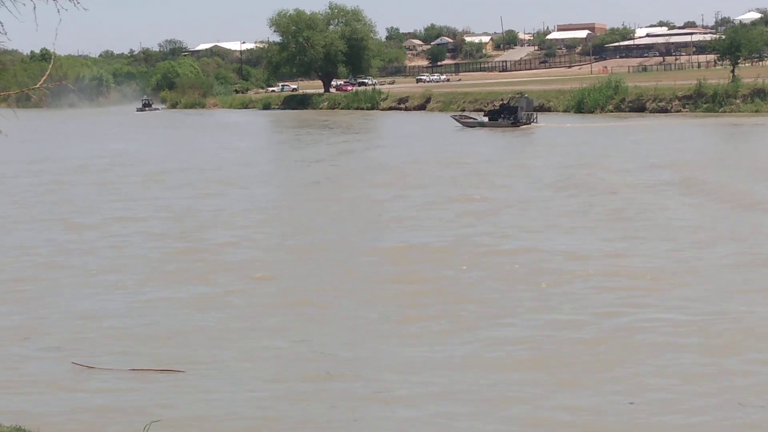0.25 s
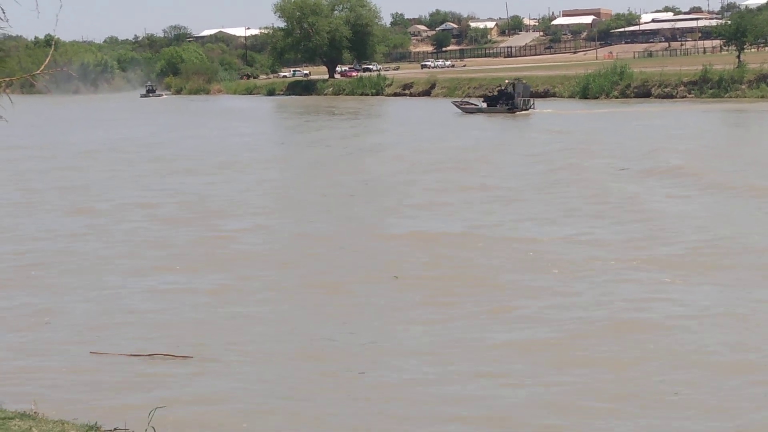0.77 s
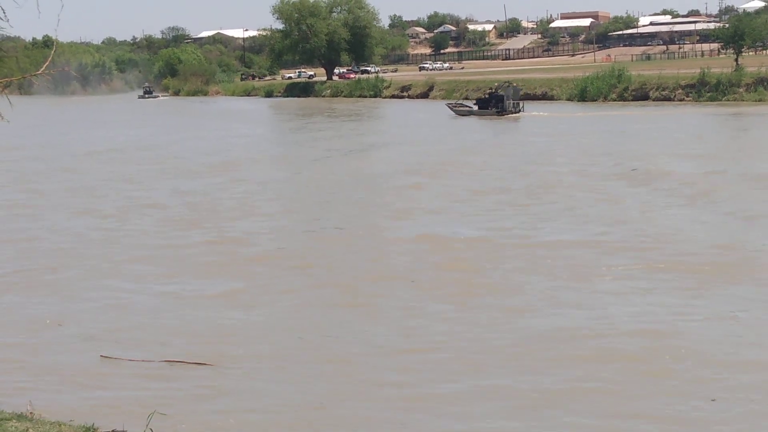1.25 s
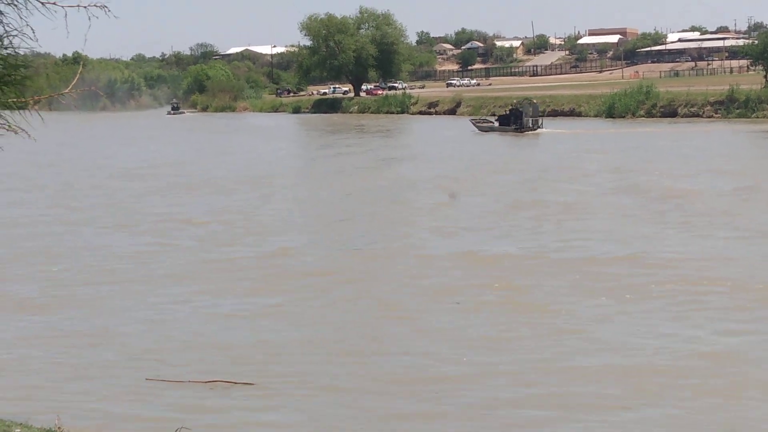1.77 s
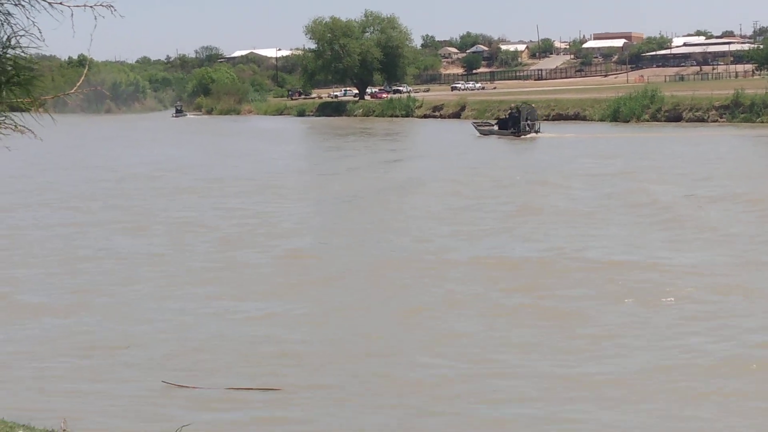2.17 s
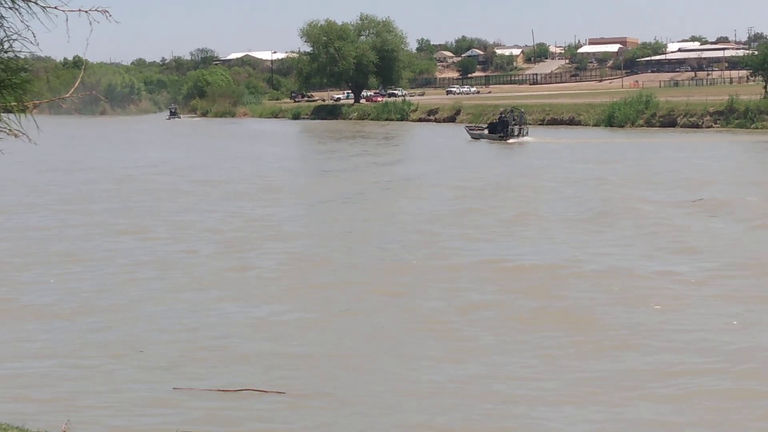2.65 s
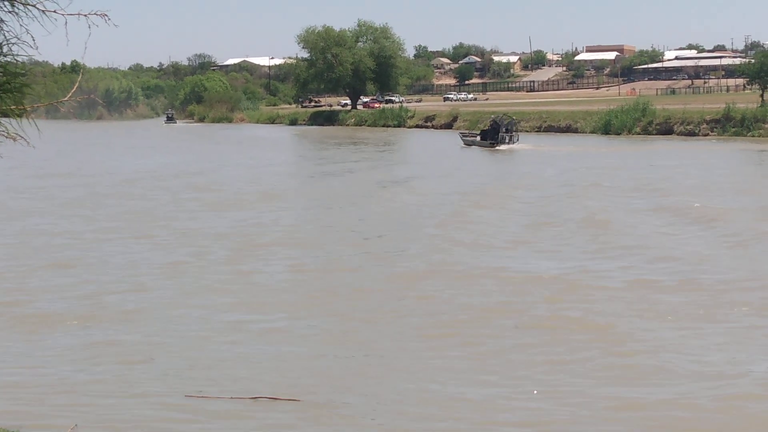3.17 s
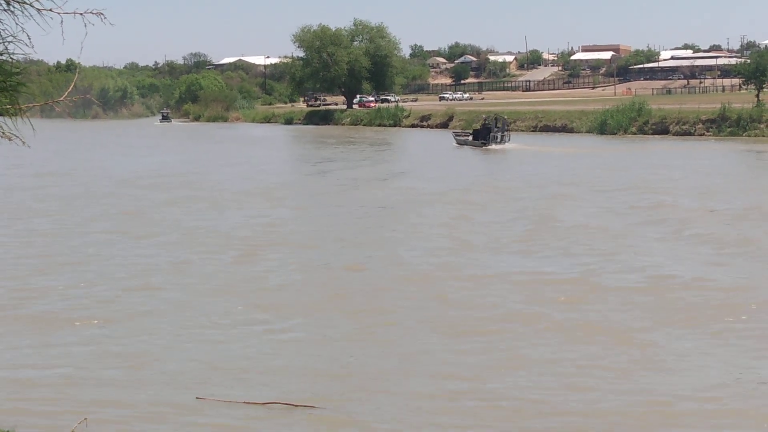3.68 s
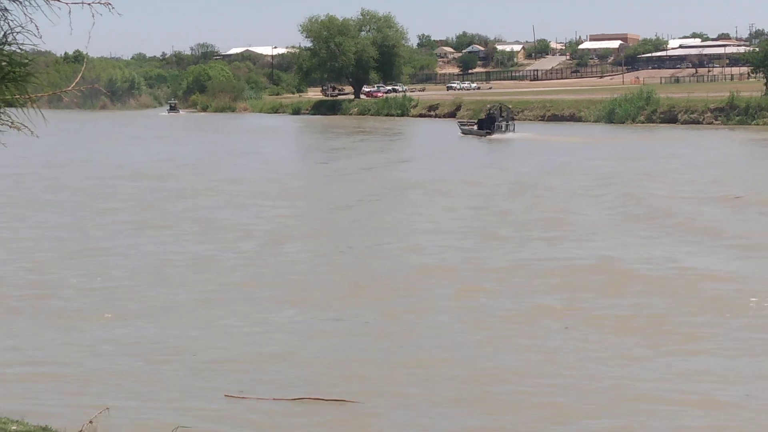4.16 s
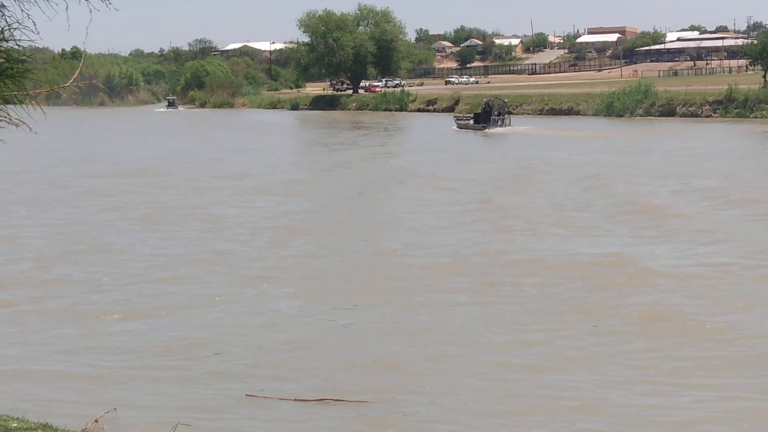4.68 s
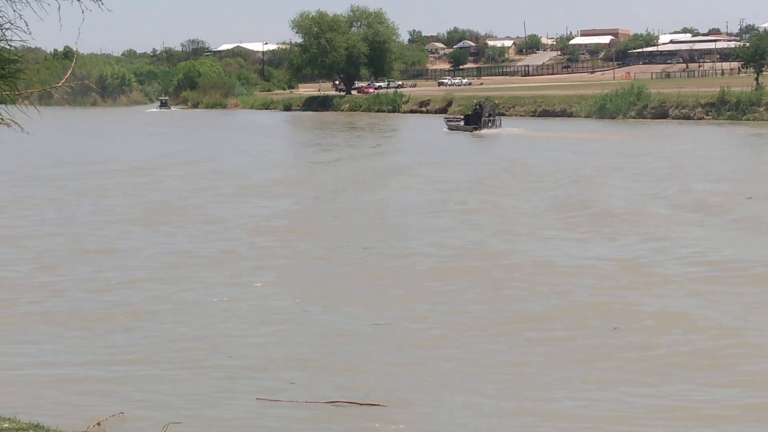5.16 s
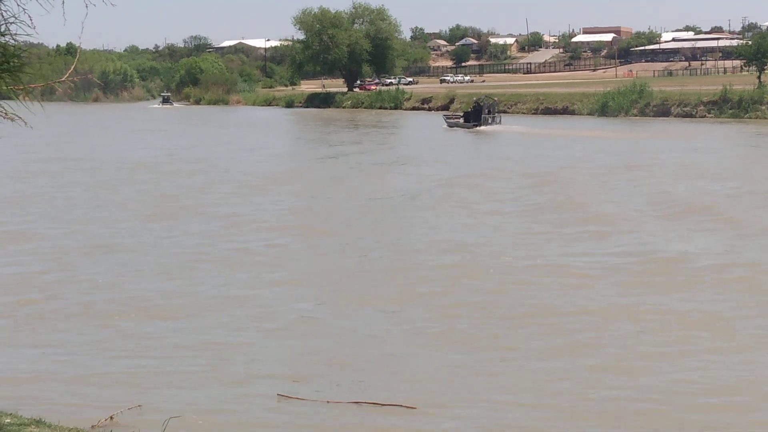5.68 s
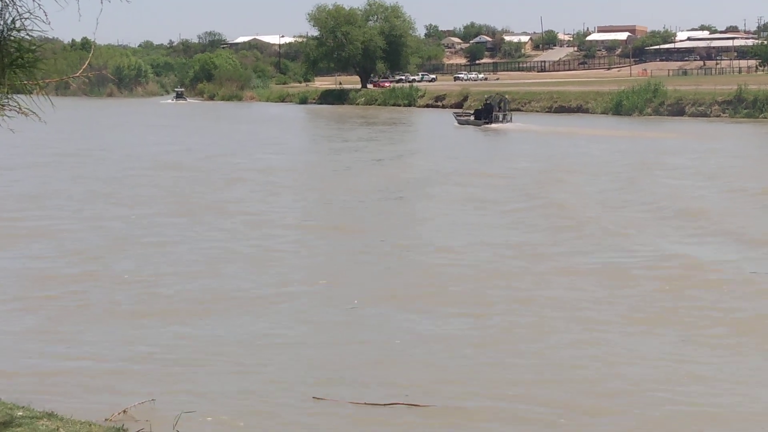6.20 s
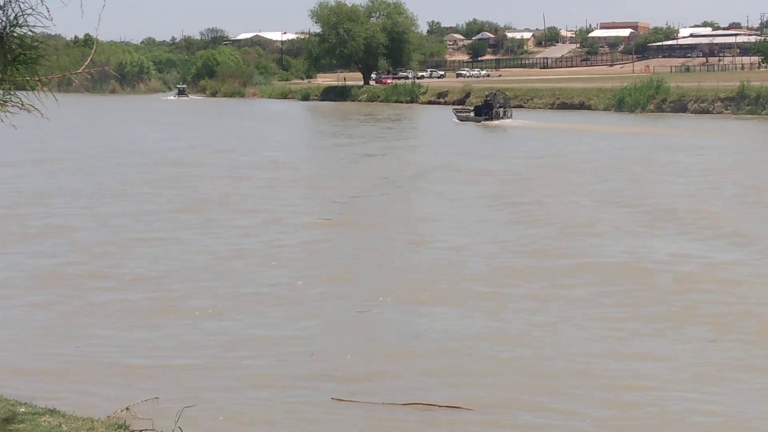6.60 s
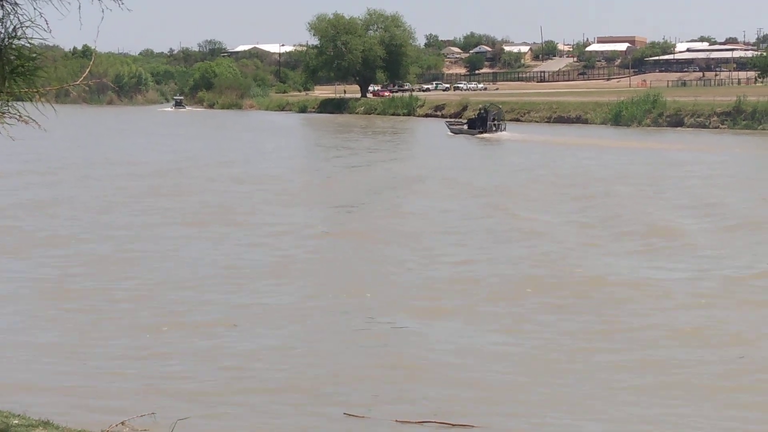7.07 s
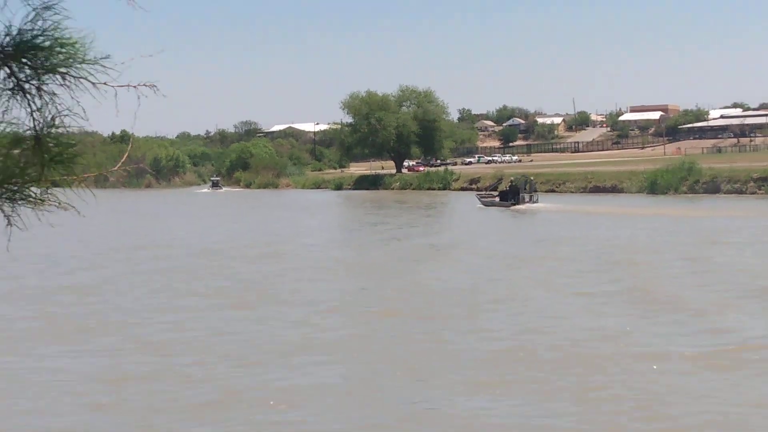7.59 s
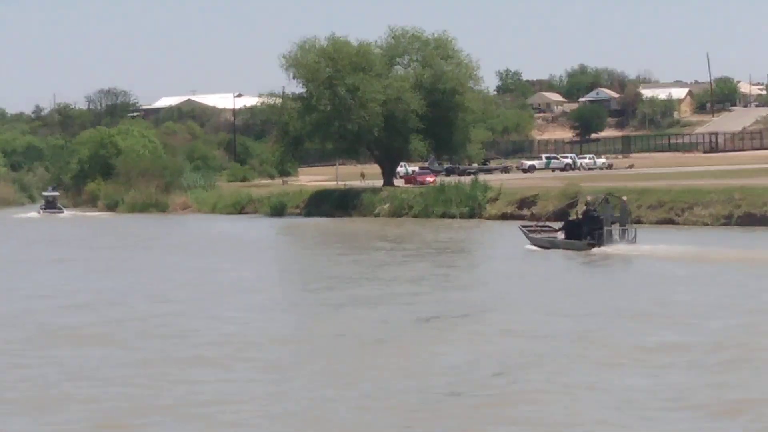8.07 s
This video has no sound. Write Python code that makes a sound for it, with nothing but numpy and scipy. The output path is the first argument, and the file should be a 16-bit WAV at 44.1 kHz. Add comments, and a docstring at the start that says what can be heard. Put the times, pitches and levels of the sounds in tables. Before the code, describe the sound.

A distant airboat's loud propeller drone drops away within two seconds, leaving a nearer airboat's throbbing, rasping engine cruising across windy open water.

```python
"""Two airboats on a wide river, heard from the far bank through a hand-held two-port microphone.
At first the farther boat drones at high revs, a bank of propeller tones over a noise roar; within two
seconds it throttles back. The nearer V8 gathers speed and then cruises: exhaust lines throb against the
tones, rasp and tip cracks of its geared propeller. Throughout, filtered noise hisses in a tree; buffeting
starts strong and dies away, with deep thumps, and a few bright handling ticks come from 4 s on."""
import sys
import numpy as np
from scipy import signal
from scipy.fft import rfft, irfft
from scipy.io import wavfile

SR = 44100
rng = np.random.default_rng(int(sys.argv[2]) if len(sys.argv) > 2 else 0)


def waveform_to_disk(signal):
    """Save audio, clipped to [-1, 1], as 16-bit WAV at the path in sys.argv[1]."""
    frames = np.transpose(np.atleast_2d(signal))
    scaled = np.clip(frames, -1, 1) * 32767
    samples = np.round(scaled).astype(np.int16)
    wavfile.write(sys.argv[1], SR, samples)


N = 367794
T = np.arange(N) / SR
HZ = np.fft.rfftfreq(N, 1 / SR)


def amp(db):
    """Decibels to gain."""
    return 10 ** (np.asarray(db) / 20)


def unit(x):
    """Scales to rms 1."""
    return x / np.sqrt(np.mean(x ** 2) + 1e-20)


def follow(table):
    """Every column of a time curve, sample by sample."""
    s, *columns = np.transpose(table)
    return [np.interp(T, s, column) for column in columns]


def read(points, hz):
    """A spectrum, or a list of line levels, joined on a log-frequency axis."""
    f, value = np.transpose(points)
    return np.interp(np.log(hz + 1e-3), np.log(f + 1e-3), value)


def drift(rate_hz):
    """Slow random wander of rms 1: noise whose spectrum falls away above rate_hz."""
    count = 2048
    hz = np.fft.rfftfreq(count, N / SR / count)
    slow = irfft(rfft(rng.standard_normal(count)) * np.exp(-(hz / rate_hz) ** 2))
    return np.interp(T, np.linspace(0, T[-1], count), unit(slow))


def noise(spectrum):
    """Two unrelated coloured noises, scaled together to rms 1."""
    white = rng.standard_normal((2, N))
    return unit(irfft(rfft(white) * amp(read(spectrum, HZ)), N))


# likeness of airborne noise at the two ports: (f/Hz, correlation 0-1 before focus)
LIKENESS = [(60, .97), (300, .95), (700, .92), (1400, .86), (3000, .72), (7000, .66), (11000, .55),
            (15000, .3)]


def airborne(spectrum, focus):
    """Coloured noise that both ports partly share; more focus draws it towards one point."""
    a, b = rfft(noise(spectrum))
    same = np.clip(read(LIKENESS, HZ) * focus, 0, .99)
    return irfft(np.array([a, same * a + np.sqrt(1 - same ** 2) * b]), N)


def fading_tone(turns, db, scatter, rate_hz):
    """One line, partly scattered in level and phase by the moving air over the water."""
    angle = 2 * np.pi * turns
    in_phase = (1 + scatter * drift(rate_hz)) * np.cos(angle)
    quadrature = scatter * drift(rate_hz) * np.sin(angle)
    return amp(db) * (in_phase + quadrature) * np.sqrt(2 / (1 + 2 * scatter ** 2))


def swells(table):
    """Envelope of bell-shaped pushes of air, added by power."""
    power = np.zeros(N)
    for s, db, length_s in table:
        power += amp(2 * db) * np.exp(-2 * ((T - s) / length_s) ** 2)
    return np.sqrt(power)


# farther propeller, throttling back: (t/s, blade rate f/Hz, first tone level/dB)
FAR_THROTTLE = [(0, 117, -11), (.5, 115.4, -13.5), (.68, 108.2, -20), (.9, 91.07, -15.5), (1, 85.57, -18.5),
                (1.1, 80.9, -34), (1.3, 72.8, -32), (1.7, 66.9, -55), (8.34, 69, -50.5)]
# its overtones: (multiple of the blade rate, level/dB before sag, flare and resonance)
FAR_OVERTONES = [(2, -26.5), (3, -36.5), (4, -53.5), (5, -45), (6, -43.5), (7, -51), (8, -62), (12, -65.5)]
# roar and overtones flare once as the throttle closes
FLARE_S, FLARE_LENGTH_S, FLARE_DB = 0.597, 0.1, 5


def far_boat(roar_db=-39.5, roar_sag_db=13, overtones_db=-2.0, overtones_sag_db=3.5,
             ring_hz=785, ring_width_hz=35, ring_db=10, scatter=0.31):
    """A propeller at full throttle drones and roars, then sinks through a resonance to a faint cruise."""
    blade_hz, first_db = follow(FAR_THROTTLE)
    slack = (blade_hz.max() - blade_hz) / np.ptp(blade_hz)  # 0 at full throttle, 1 at its slowest
    flare_db = FLARE_DB * np.exp(-((T - FLARE_S) / FLARE_LENGTH_S) ** 2)
    turns = np.cumsum(blade_hz) / SR
    drone = fading_tone(turns, first_db, .04, 6)
    overtone_gain_db = overtones_db - overtones_sag_db * slack + flare_db
    for k in range(2, 13):
        # a tone lifts while it passes the resonance
        lift_db = ring_db * np.exp(-((k * blade_hz - ring_hz) / ring_width_hz) ** 2)
        level_db = read(FAR_OVERTONES, k) + overtone_gain_db + lift_db
        drone += fading_tone(k * turns + rng.random(), level_db, scatter, 5)
    roar = airborne([(200, -33), (700, 2.5), (1300, 2.5), (2000, 2.0), (3300, -2), (4500, -13),
                     (7000, -42.5), (14000, -51)], 0.61)
    blade_pulse = 1 + 0.22 * np.cos(2 * np.pi * turns)
    return drone + roar * amp(roar_db - roar_sag_db * slack + flare_db) * blade_pulse


# nearer engine, also driving its propeller: (t/s, four-stroke cycle rate f/Hz)
ENGINE_SPEED = [(0, 17.66), (1.5, 18.19), (2.6, 18.39), (3.5, 18.88), (4, 19.26), (5, 19.87), (6, 20.16),
                (8.34, 20.16)]
# exhaust lines: (multiple of the cycle rate, slow level/dB, cruise level/dB), before heading
EXHAUST_LINES = [(3, -44, -47), (4, -58, -44), (5, -29.5, -26), (6, -34.5, -32), (7, -41, -28.5),
                 (8, -23, -23.5), (9, -28, -40), (10, -54, -38), (11, -26.5, -32), (12, -51, -56),
                 (13, -36, -40.5), (14, -67, -47), (15, -47.5, -55), (16, -38.5, -76), (18, -49.5, -46.5)]
# exhaust as the boat turns: (t/s, firing line level/dB, lope of the uneven banks level/dB), added to the lines
EXHAUST_HEADING = [(0, -7.5, -5.5), (.7, -8, 1.5), (1.2, -7, 0.5), (2, -1, 0), (3, -0.5, .5),
                   (3.85, 1, -4.5), (4.25, -4.5, -7), (4.7, -0.5, -2.2), (5.1, -2, -1.5), (5.6, 1, -5),
                   (6.2, 2.5, -2.5), (7.4, 2, -1.5), (8.34, -5, -3)]
SLOW_HZ, CRUISE_HZ, FIRST_THROB_S = 18.4, 20.1, .036


def exhaust(pipe_hz=160, pipe_width_hz=32):
    """Eight firings a cycle make the main line; the uneven banks fill in the other multiples."""
    speed_hz, = follow(ENGINE_SPEED)
    firing_db, lope_db = follow(EXHAUST_HEADING)
    turns = np.cumsum(speed_hz) / SR - FIRST_THROB_S * speed_hz[0]
    cruise = np.clip((speed_hz - SLOW_HZ) / (CRUISE_HZ - SLOW_HZ), 0, 1)
    out = np.zeros(N)
    for k, slow_db, cruise_db in EXHAUST_LINES:
        heading_db = firing_db if k == 8 else lope_db
        line_db = slow_db + cruise * (cruise_db - slow_db) + heading_db
        # the pipe's ring smears each firing
        lag = np.arctan(2 * (k * speed_hz - pipe_hz) / pipe_width_hz) / np.pi
        out += fading_tone(k * turns - lag, line_db, .04, 5)
    return out


# nearer propeller: (multiple of the blade rate, level/dB at cruise)
NEAR_BLADE_TONES = [(1, -51.5), (2, -28.5), (3, -35), (4, -42), (5, -50.5), (6, -41.5), (7, -49.5),
                    (8, -49), (9, -48.5), (10, -51), (11, -51.5), (12, -50.5), (14, -62), (16, -58),
                    (20, -70)]
# torn air as the disc swings into view: (t/s, overall level/dB, tip crackle level/dB on top of that)
TORN_AIR_LEVEL = [(0, -35, -14), (1.4, -38.5, -13), (1.75, -35, -18), (2.4, -38, -11.5), (3, -37.5, -5.5),
                  (3.6, -34, -6.5), (4.45, -40, -4), (5.2, -37, -3.5), (5.75, -39, -9.5), (7.25, -37, 0),
                  (7.7, -37.5, -2.5), (8.34, -40, -1.5)]
# colour of the steady rasp: (f/Hz, relative level/dB per Hz)
RASP_COLOUR = [(60, -3), (200, 11.5), (400, 4), (800, 4.5), (1100, 0), (1500, -17), (2000, -8),
               (3000, -25.5), (5000, -21.5), (9000, -35.5), (16000, -63)]
# bright edge of the tip crackle: (f/Hz, relative level/dB per Hz)
SNAP_COLOUR = [(300, -33), (900, -3), (1400, 5), (2100, -5.5), (3300, -6.5), (4500, -8), (7000, -35),
               (14000, -50)]
BLADES_PER_CYCLE = 3.49  # blade passes per engine cycle, through the gearing


def propeller(rasp_db=-1.0, chop=0.22, brighten_db=5, snap_db=-3, snap_growth=3.4,
              crack_turns=0.15, uneven_db=2):
    """Blade tones that brighten with tip speed, a rasp of torn air, and a crack from each passing tip."""
    speed_hz, = follow(ENGINE_SPEED)
    turns = BLADES_PER_CYCLE * np.cumsum(speed_hz) / SR
    level_db, crackle_db = follow(TORN_AIR_LEVEL)
    slack = (CRUISE_HZ - speed_hz) / (CRUISE_HZ - SLOW_HZ)
    tones = np.zeros(N)
    for k in range(1, 21):
        tone_db = read(NEAR_BLADE_TONES, k) - brighten_db * slack * (k > 7)
        # the higher the line, the more the air scatters it
        tones += fading_tone(k * turns + rng.random(), tone_db, .12 * k + .15, 3 + .6 * k)
    chopping = unit(np.exp(chop * np.cos(2 * np.pi * turns)))
    rasp = airborne(RASP_COLOUR, 1) * chopping * amp(rasp_db)
    since_pass = turns % 1  # fraction of a blade period
    cracks = np.exp(-since_pass / crack_turns) * (1 - np.exp(-since_pass / .04))
    cracks = unit(cracks * amp(uneven_db * drift(22)))
    crackle = airborne([(250, -17), (600, 2.5), (1000, 4.0), (1550, -6.5), (2200, -11),
                        (3500, -25.5), (9000, -38)], 0.93) * amp(crackle_db)
    # the snap grows faster than the crackle
    snap = airborne(SNAP_COLOUR, 0.72) * amp(snap_db + snap_growth * crackle_db)
    return tones + amp(level_db) * (rasp + cracks * (crackle + snap))


# wind in the tree: (t/s, level/dB before level_db)
TREE_LEVEL = [(0, -53.5), (.45, -53.5), (.95, -47), (1.4, -47.5), (1.7, -51), (2, -49.5), (2.25, -45.5),
              (2.75, -45), (3.05, -48), (3.6, -50), (3.85, -46), (4.25, -46.5), (4.6, -42.5), (5.85, -46),
              (6.75, -40.5), (7.4, -43), (8.34, -44)]
# colour of its leaves: (f/Hz, relative level/dB per Hz)
LEAF_COLOUR = [(300, -27), (1500, 8), (2600, 6), (4000, 2.5), (5500, 3.5), (7500, 2.5), (9400, -2),
               (11000, -9), (12000, -14.5), (14000, -22.5), (16000, -20)]


def tree(level_db=3.5, flutter_db=.5):
    """Fine foliage hisses as noise, swelling with the wind."""
    swell_db, = follow(TREE_LEVEL)
    return airborne(LEAF_COLOUR, 0.96) * amp(swell_db + level_db + flutter_db * drift(23))


# breeze on the microphone, easing and then dying away: (t/s, level/dB before level_db)
BREEZE_LEVEL = [(0, -38), (3.8, -41), (5.2, -42), (6.3, -53), (8.34, -63)]
# gusts that stand out of it: (t/s, peak level/dB before level_db, half length/s)
GUST_SWELLS = [(.07, -30, 0.089), (.36, -28.5, 0.032), (.55, -42, 0.092), (1.12, -31, 0.11),
               (1.35, -30, 0.026), (1.54, -32.5, .05), (1.75, -31.5, 0.11), (1.94, -31.5, 0.091),
               (2.15, -29, 0.11), (2.44, -31.5, 0.1), (2.88, -43, .06), (3.07, -33, 0.033),
               (3.53, -35, 0.091), (3.73, -30.5, 0.085), (3.87, -31.5, 0.046), (4.18, -34, 0.039),
               (4.42, -26, .04), (4.57, -33.5, 0.039), (4.74, -31, 0.069), (4.95, -32, 0.043),
               (5.14, -32.5, 0.092)]
# the side that the wind comes from: (t/s, left minus right level/dB)
WIND_BALANCE = [(0, 0), (1.8, 3.5), (2.6, -0.5), (3.2, -3.5), (4, -2), (4.6, 0), (5.2, -8.5), (6.2, -4)]
# colour of the rumble: (f/Hz, relative level/dB per Hz)
RUMBLE_COLOUR = [(15, -30), (32, -16.5), (45, -32), (70, -18.5), (100, 0.5), (190, -4), (260, -6),
                 (400, -14.5), (600, -25.5), (1000, -44.5), (2500, -59), (8000, -82)]


def buffeting(level_db=10.5, lump_db=2.0, crest_db=-12, crest_growth=0.99):
    """Eddies strike each port on its own; a crest of higher pitch follows their strength."""
    breeze_db, = follow(BREEZE_LEVEL)
    gust_db = 20 * np.log10(np.hypot(amp(breeze_db), swells(GUST_SWELLS)))
    side_db, = follow(WIND_BALANCE)
    lumps = np.array([unit(amp(lump_db * drift(29))) * amp(sign * side_db / 2) for sign in (1, -1)])
    rumble = noise(RUMBLE_COLOUR) * amp(gust_db + level_db)
    crest = noise([(100, -31.0), (250, -0.5), (450, 10.0), (900, -19), (2500, -45.0), (8000, -63)])
    strongest_db = gust_db.max()
    crest *= amp(strongest_db + crest_db + crest_growth * (gust_db - strongest_db))
    return lumps * (rumble + crest)


# large eddies that thump the ports: (t/s, peak rms level/dB, half length/s)
THUMP_SWELLS = [(0.249, -23, 0.024), (1.78, -26, .03), (2.26, -23, 0.027), (3.47, -27, 0.035),
                (4.029, -28, 0.017), (4.51, -26, 0.011), (5.973, -30, 0.045)]


def thumps():
    """Short, deep shoves of wind: bell-shaped bursts of low noise."""
    return swells(THUMP_SWELLS) * noise([(15, -32), (35, -23), (60, -2), (90, 6.5), (140, -11),
                                         (250, -22), (800, -65), (8000, -120)])


# small handling ticks: (t/s, peak level/dB before level_db, left minus right level/dB)
TICK_TIMES = [(3.997, -40, 8), (4.068, -43, 4), (4.772, -45, 0), (5.05, -41, 8), (5.235, -47, 0),
              (7.115, -45, -8), (7.138, -32, -12)]
# their colour: (f/Hz, relative level/dB per Hz)
TICK_COLOUR = [(2000, -30), (6000, -4), (8000, -1), (11500, 0), (13000, -8), (16000, -15)]


def ticks(level_db=3, decay_s=0.0016):
    """Fingers on the camera: short bright noise bursts that start at once and decay exponentially."""
    envelope = np.zeros((2, N))
    for s, db, pan_db in TICK_TIMES:
        sides = amp([[db + pan_db / 2], [db - pan_db / 2]])
        envelope += sides * (T >= s) * np.exp(-abs(T - s) / decay_s)
    return amp(level_db) * noise(TICK_COLOUR) * envelope


# peaks and dips of the housing: (f/Hz, width f/Hz, left level/dB, right level/dB), at depth 1 and stretch 1
HOUSING_PEAKS = [(1269, 55, -15.5, -9.5), (1658, 110, -10, -2), (1816, 180, 2.5, 2.5),
                 (2310, 215, -4.5, -10), (2555, 120, -4, -1.5), (3187, 193, -4.5, -15), (3820, 103, 0, 11),
                 (3880, 130, 8, -8), (4480, 140, 1, 3.5), (4840, 120, -0.5, -4), (5060, 110, -3, -0.5),
                 (5230, 89, 6, 3), (6360, 180, 3.5, 1.5), (8670, 220, -1, 1.5)]
# the hand cupped beside the ports: (t/s, depth of the housing's colour 0-1.5)
HAND_DEPTH = [(0, 0.9), (.8, 0), (1.15, 0.94), (1.75, 1.5), (2.4, 1), (3.5, 0.9), (4.8, 0.82), (7.1, 0.8),
              (7.45, .9), (7.8, 0.4)]
# the hand at the right port: (t/s, echo delay/ms, echo strength 0-1, factor on that port's peak pitches)
RIGHT_PORT_HAND = [(0, 1.33, 0, 1), (1.15, 1.33, .22, 1), (7.1, 1.33, .2, 1), (7.25, .53, .25, 1.01),
                   (7.45, .26, .25, 1.05), (7.8, .172, .45, 1.08), (8.34, .2, .25, 1.08)]


def housing(x):
    """The camera body and the cupped hand colour each port; the hand adds a short echo on the right."""
    depth, = follow(HAND_DEPTH)
    delay_ms, strength, stretch = follow(RIGHT_PORT_HAND)
    hz, s, z = signal.stft(x, SR, nperseg=1024)
    port_stretch = np.array([np.ones(len(s)), np.interp(s, T, stretch)])
    hz = hz[:, None] / port_stretch[:, None]
    colour_db = 0
    for f, width, left_db, right_db in HOUSING_PEAKS:
        sides_db = np.array([left_db, right_db])[:, None, None]
        colour_db = colour_db + sides_db * np.exp(-((hz - f) / width) ** 2)
    coloured = z * amp(colour_db * np.interp(s, T, depth))
    left, right = signal.istft(coloured, SR, nperseg=1024)[1][:, :N]
    echo = np.interp(T - delay_ms / 1000, T, right)
    return np.array([left, right + strength * echo])


# balance between the ports: (f/Hz, left minus right level/dB)
PORT_TILT = [(60, -4), (200, 0.8), (400, -0.5), (700, -2.5), (1300, 2), (2400, 2), (4400, -4), (8000, 0.5),
             (15000, -2.5)]
# phase between the ports: (f/Hz, angle/rad by which left leads)
PORT_LEAD = [(20, 0), (100, -.16), (160, -.14), (250, -.05), (700, -.35), (1500, -.4), (4000, -.95),
             (8000, -1.75), (15000, -2.6)]


def ports(x):
    """Level and phase differences between the two ports, split evenly between them."""
    hz = np.fft.rfftfreq(2 * N, 1 / SR)
    half = amp(read(PORT_TILT, hz) / 2) * np.exp(.5j * read(PORT_LEAD, hz))
    return irfft(rfft(x, 2 * N) * np.array([half, 1 / half]))[:, :N]


def scene():
    """Boats and tree come through the air; wind and fingers act on the camera itself."""
    through_air = far_boat() + exhaust() + propeller() + tree()
    return ports(housing(through_air)) + buffeting() + thumps() + ticks()


def record(dry, edge_hz=15750):
    """Brief fades at both ends, then a steep low-pass that sets the band limit."""
    faded = dry * signal.windows.tukey(N, .001)
    low_pass = signal.firwin(511, edge_hz, window=("kaiser", 9), fs=SR)
    return signal.oaconvolve(faded, low_pass[None], "same")


dry = scene()
out = record(dry)
waveform_to_disk(out)
```